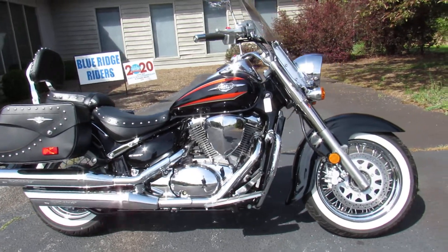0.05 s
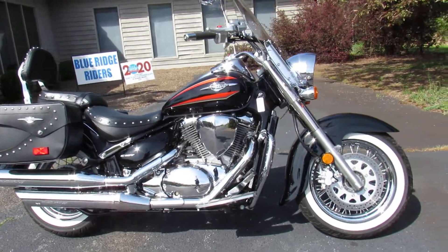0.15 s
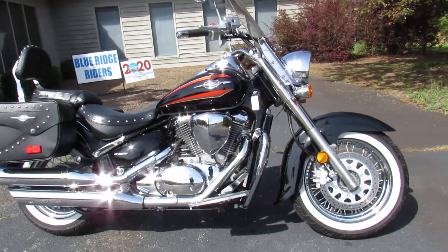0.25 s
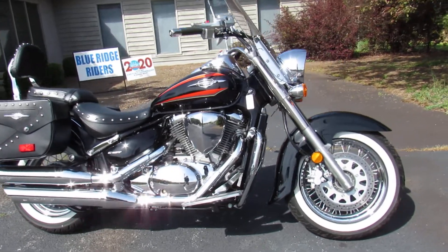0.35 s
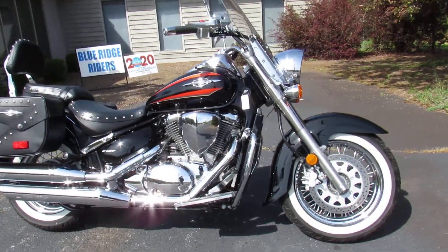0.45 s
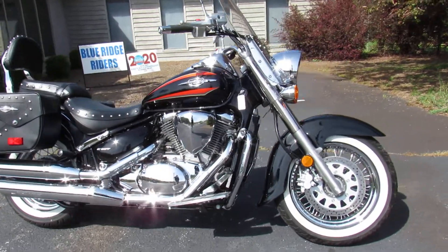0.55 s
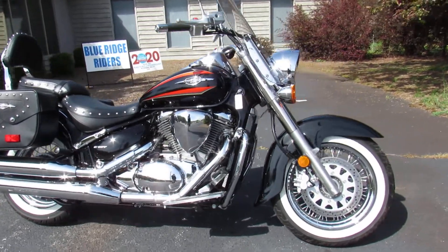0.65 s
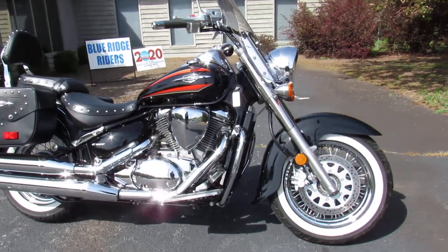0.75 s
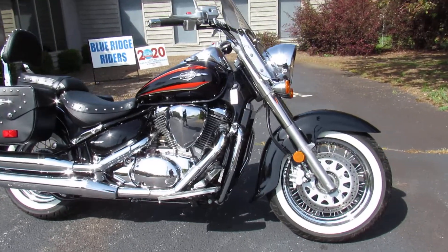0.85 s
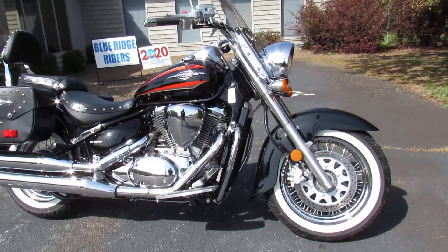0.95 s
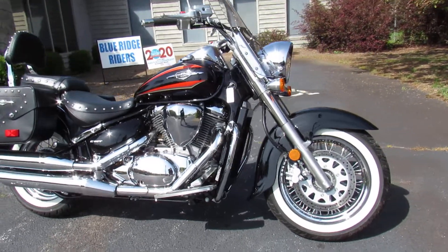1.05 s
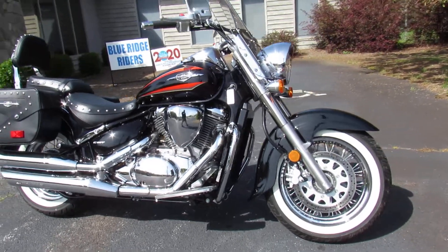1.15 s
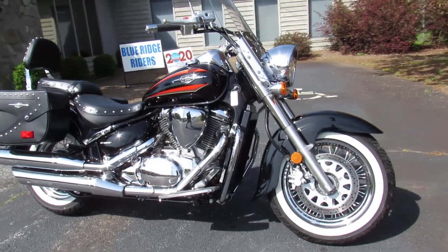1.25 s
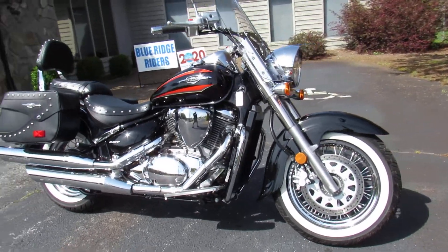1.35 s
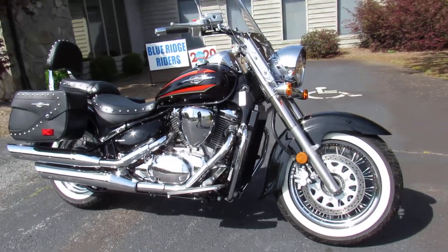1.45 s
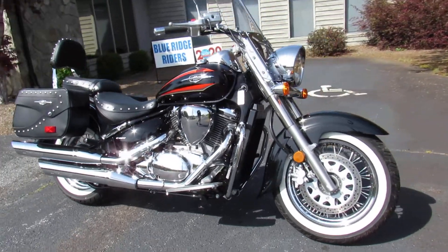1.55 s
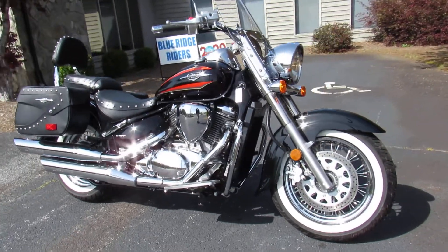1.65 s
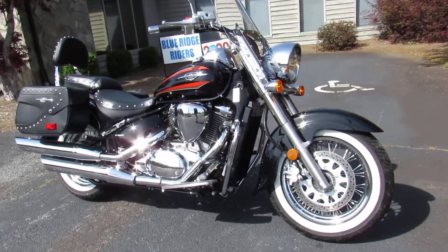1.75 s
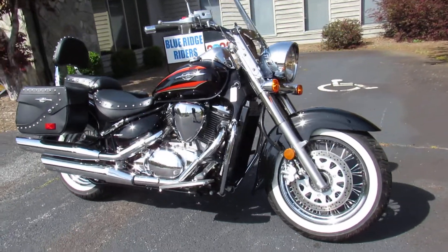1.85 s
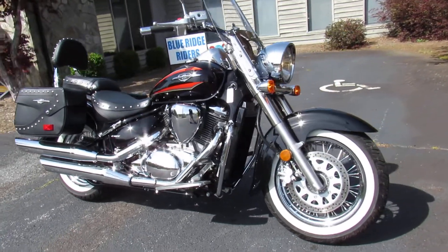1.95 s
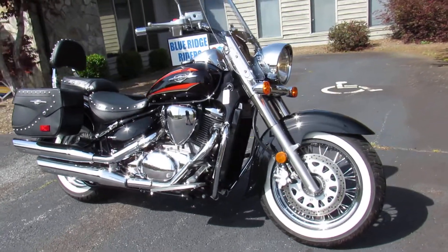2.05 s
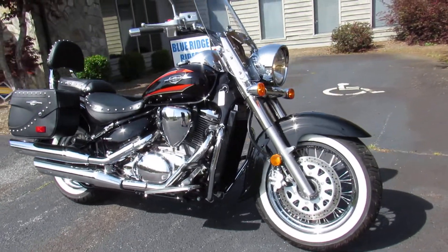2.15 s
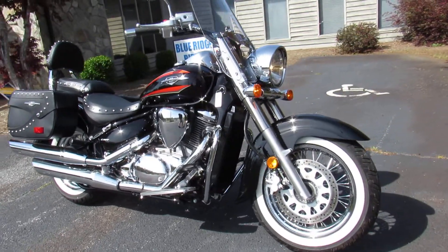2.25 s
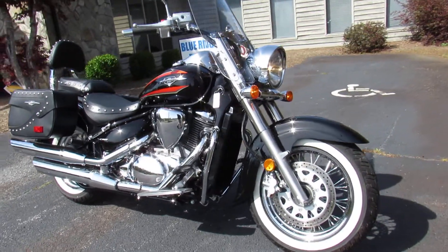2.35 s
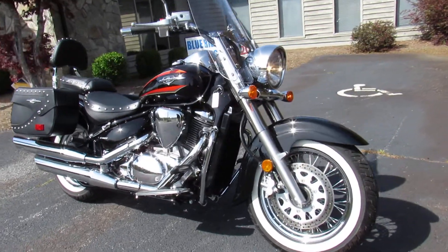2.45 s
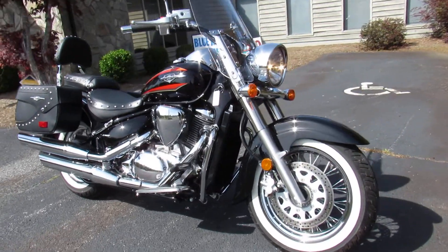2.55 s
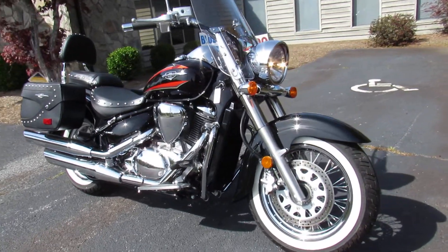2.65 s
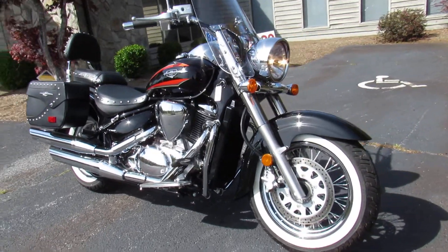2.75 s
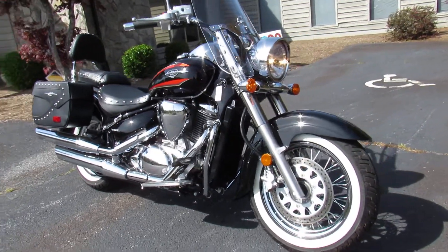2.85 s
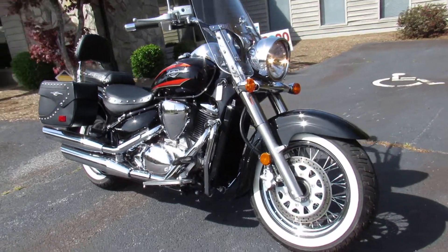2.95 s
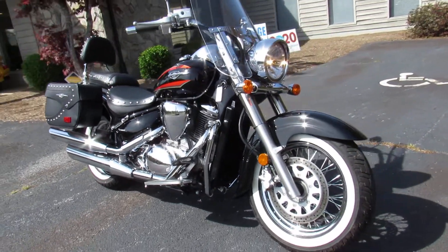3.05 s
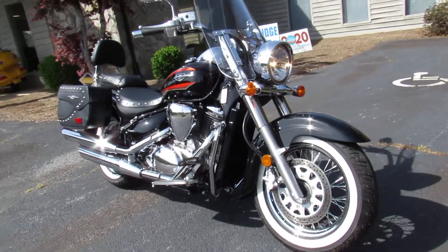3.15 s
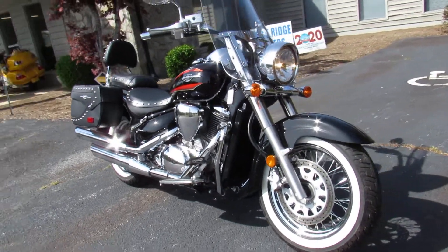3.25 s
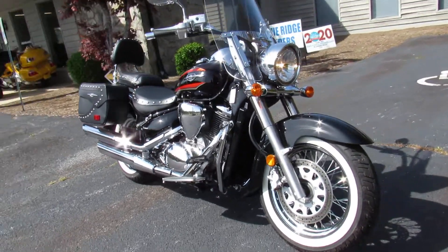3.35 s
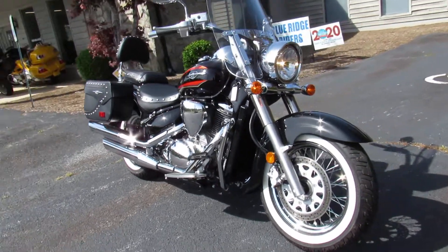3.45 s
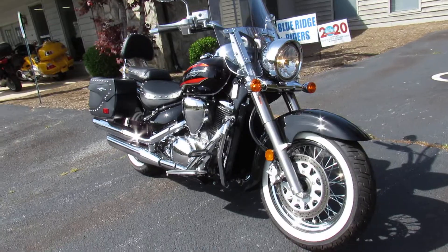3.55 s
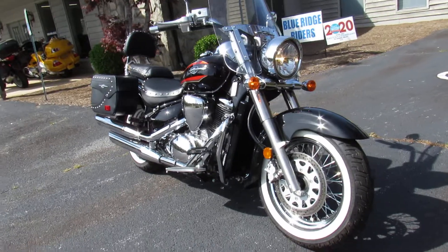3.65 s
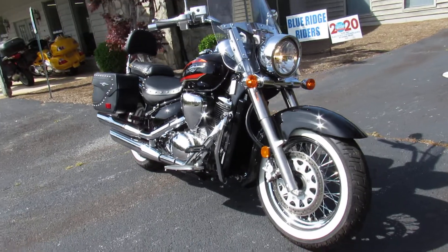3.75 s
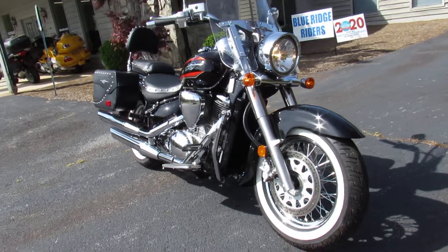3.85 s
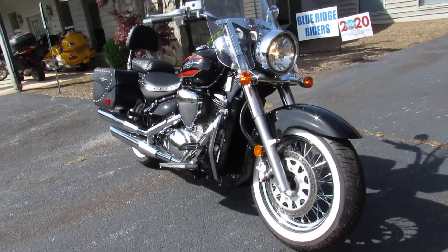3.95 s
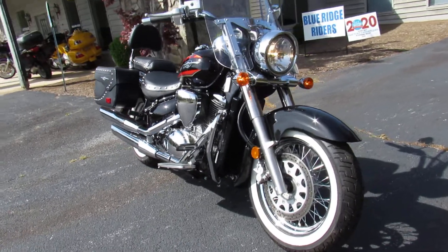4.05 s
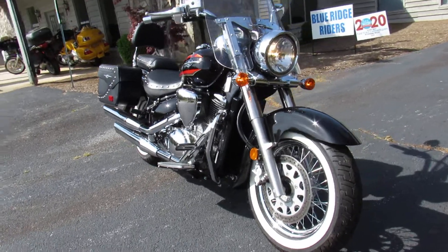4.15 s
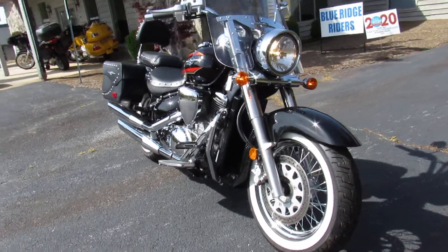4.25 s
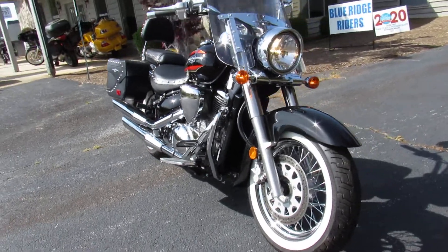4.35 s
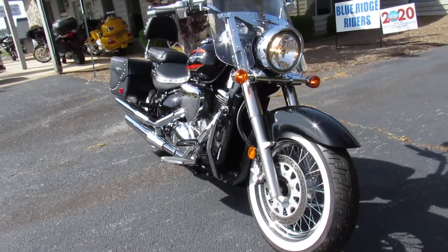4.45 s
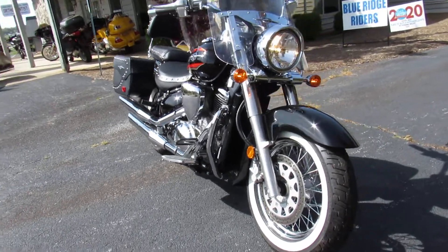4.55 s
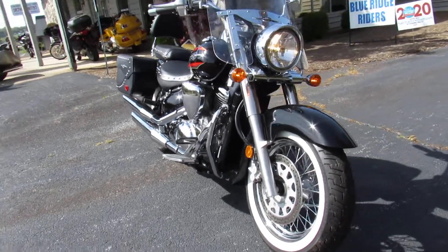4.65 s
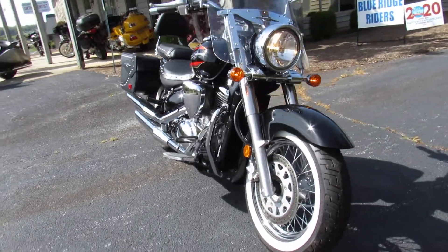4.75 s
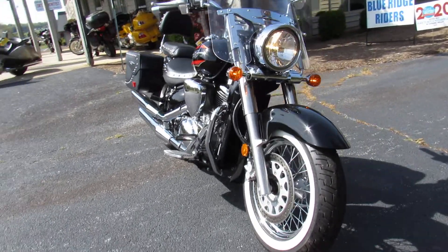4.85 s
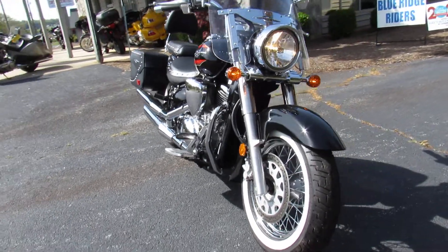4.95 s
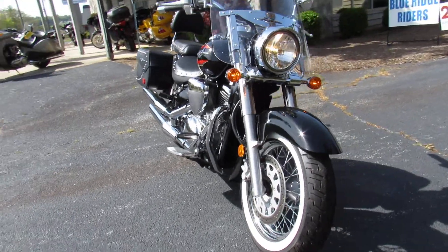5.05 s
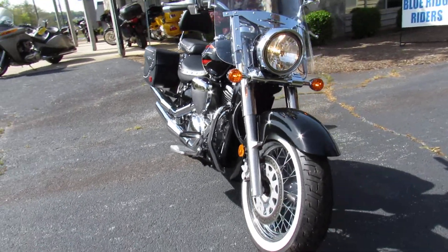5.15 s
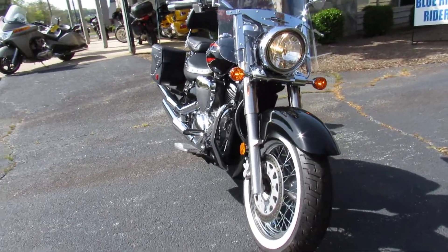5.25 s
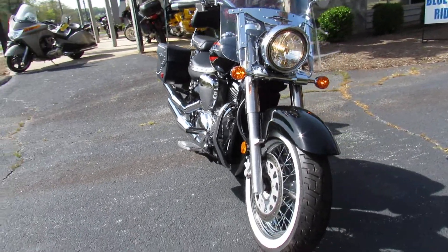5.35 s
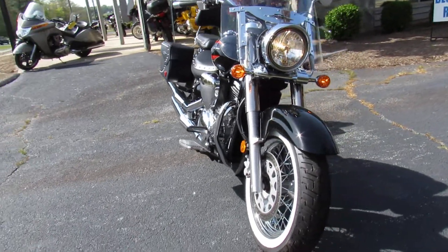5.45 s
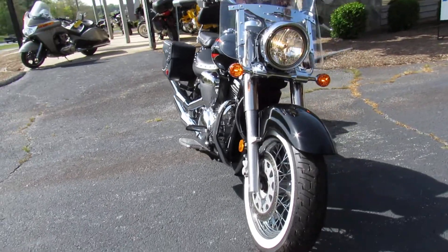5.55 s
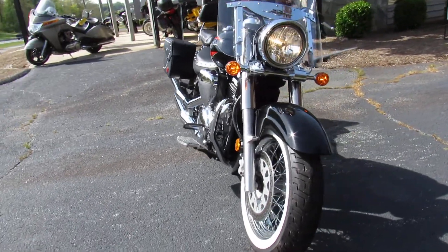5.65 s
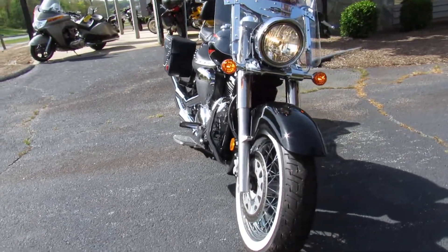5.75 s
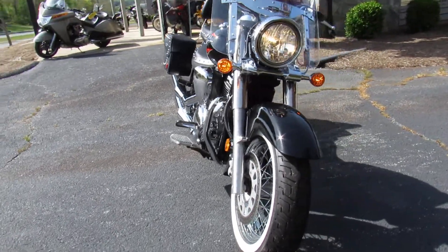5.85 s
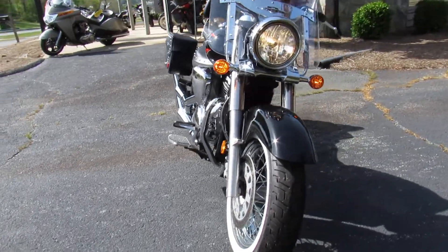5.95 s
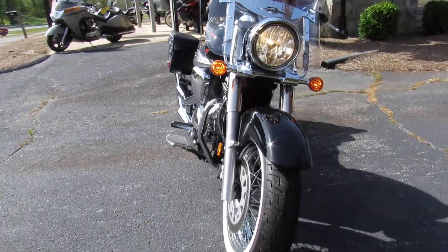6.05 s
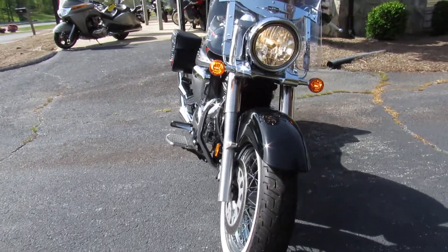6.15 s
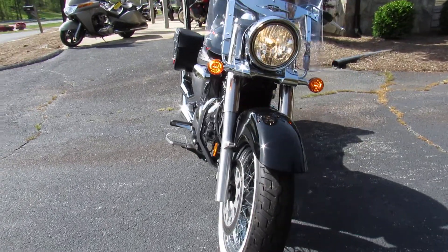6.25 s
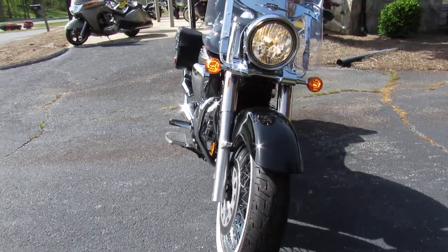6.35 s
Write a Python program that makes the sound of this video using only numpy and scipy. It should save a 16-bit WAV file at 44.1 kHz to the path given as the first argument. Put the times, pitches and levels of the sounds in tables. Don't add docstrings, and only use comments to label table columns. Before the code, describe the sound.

Outdoors on a paved yard, a twin-cylinder motorcycle idles throughout with paired, uneven low thumps, breathy exhaust chuff and busy metallic ticking. It starts distant and quiet beneath short low wind buffets hitting a small hand-held camera's close stereo microphones. The wind dies after about two and a half seconds while the engine grows steadily louder, then stays level up close.

```python
import sys
import numpy as np
from scipy import signal
from scipy.fft import rfft, irfft, next_fast_len
from scipy.io import wavfile
from scipy.ndimage import uniform_filter1d

SR = 44100
rng = np.random.default_rng(int(sys.argv[2]) if len(sys.argv) > 2 else 0)


def elevation(decibels):
    levels = np.asarray(decibels, float)
    return 10 ** (levels / 20)


def persist_wave(psi):
    counts = np.round(np.clip(psi, -1, 1) * 32767).astype(np.int16)
    wavfile.write(sys.argv[1], SR, np.atleast_2d(counts).T)


N = 282240
PAD = 4410
SIZE = N + 2 * PAD
TIME = (np.arange(SIZE) - PAD) / SR
HZ = np.fft.rfftfreq(SIZE, 1 / SR)

# time_s, speed_cycles_per_s
IDLE_SPEED = [(0, 9.359), (.77, 9.475), (1.26, 9.471), (1.87, 10.094), (1.934, 9.385), (2.4, 9.589),
              (3.04, 10.001), (3.28, 9.601), (3.6, 10.137), (3.99, 9.639), (4.47, 10.316), (4.78, 9.728),
              (5.44, 9.936), (5.51, 10.012), (6.28, 9.88), (6.33, 9.35), (6.4, 9.35)]
FIRST_CYCLE, NOMINAL_SPEED = -.882, 9.93
# place_cycle (0-1), puff_hz
FIRINGS = [
    (0.123, 356.9),
    (0.414, 50.0),
]
# pitch_hz, width_hz, strength (signed ratio)
FRONT_PIPE = [(56.1, 44.2, -0.66), (92.3, 5.0, 0.2), (125.9, 5.0, -0.07), (134.8, 5.6, 0.09)]
REAR_PIPE = [(42.6, 5.3, -0.15), (84.0, 19.2, 1.48), (116.3, 12.2, -0.18), (156.1, 5.0, -0.6)]
# time_s, level_db
ENGINE_LEVEL = [
    (0, -32),
    (.6, -29.5),
    (1.4, -28.5),
    (2, -26.5),
    (2.6, -24),
    (4, -19),
    (4.7, -16.5),
    (5.4, -15),
    (6.4, -15),
]
# pitch_hz, level_db (per Hz)
CHUFF_COLOUR = [(20, -28), (45, -21), (70, 0.5), (120, -2.5), (160, -1.5), (200, -0.5), (270, -3.5),
                (330, -8), (450, -12.5), (600, -13.5), (800, -19.5), (1200, -59.5)]
# pitch_hz, level_db (per Hz)
CLATTER_COLOUR = [(440, -46), (750, -8), (997, -0.5), (1540, -3.5), (2350, -12.5), (2590, -13.5),
                  (4200, -23.5), (4810, -21), (5180, -23.5), (7240, -26), (9450, -36.5), (11000, -45),
                  (12400, -39), (14500, -48)]
# pitch_hz, width_hz, level_db
FINS = [(970, 90, -6), (1970, 40, -3), (2525, 40, -5), (2640, 38, -1), (2885, 60, -4), (3180, 50, -5),
        (3420, 160, -5), (3976, 40, -4), (4500, 48, -3), (4903, 35, -3), (5335, 25, -2), (5905, 25, -2),
        (6550, 35, -4)]
# place_cycle (0-1), spread_cycle (0-1), level_db, centre_hz
VALVES = [
    (.21, .018, 1, 8000),
    (.26, .03, 3, 2100),
    (.32, .04, -1, 800),
    (.43, .035, 0, 5500),
    (.71, .022, 6, 11500),
    (.78, .07, -4, 4500),
    (.88, .03, 1, 2700),
    (.89, .022, 1, 13000),
    (.9, .025, 2, 1000),
]
CLATTER_DB = -15
SHADE_FROM_S, SHADE_DB_PER_S = 5.12, -2
# pitch_hz, left_minus_right_db
BALANCE = [(60, 6), (140, 6), (320, 4.8), (490, 4), (750, 1.5), (1140, .5), (1740, 0), (4100, 0), (4500, 2),
           (5500, 4), (7400, 8), (9300, .8), (11500, -.5), (12800, -4)]
# pitch_hz, lead_radians
LEAD = [(0, 0), (950, -0.5), (2670, -0.0), (4220, -0.1), (7060, -1.3), (9040, -2.8), (9560, -2.9),
        (11100, -3.1), (12700, -2.9), (14500, -3.2)]
# pitch_hz, likeness (0-1)
LIKENESS = [(60, .998), (300, .98), (900, .96), (2200, .955), (2700, .985), (3500, .99), (4000, .994),
            (4400, .94), (5500, .86), (8000, .78), (11000, .9), (12500, .58), (14000, .35)]
# pitch_hz, level_db (per Hz)
LIGHT_COLOUR = [(15, -24), (40, -35), (90, 20), (180, 13), (350, 0.5), (600, -28), (1200, -51)]
# pitch_hz, level_db (per Hz)
GUST_COLOUR = [(15, -28), (50, -2), (135, -5), (300, 0), (440, -3.5), (680, -17), (950, -21), (1300, -38),
               (2000, -65)]
# start_s, hold_s, level_db
PUFFS = [(.08, 0.051, -20.5), (0.245, 0.067, -14), (.35, .17, -22), (.55, 0.12, -27.5),
         (0.743, 0.014, -17.5), (0.811, 0.042, -15.5), (.94, 0.071, -27), (1.127, 0.089, -19),
         (1.223, 0.083, -13), (1.36, 0.073, -21.5), (1.531, 0.081, -17), (1.662, .02, -20),
         (1.85, 0.27, -42), (2.24, .11, -26), (2.358, 0.13, -21.5), (2.57, 0.093, -41)]
PUFF_RISE_DB_PER_S, PUFF_FALL_DB_PER_S, CALM_DB = 420, 330, -68


def evened(x):
    return x / np.sqrt(np.mean(x ** 2) + 1e-20)


def read(points, hz):
    f, value = np.transpose(points)
    return np.interp(np.log(hz + 1), np.log(f + 1), value)


def curve(rows):
    time_s, value = np.transpose(rows)
    return np.interp(TIME, time_s, value)


def coloured(x, gain):
    return irfft(rfft(x) * gain, SIZE)


def lumps(hz, channels=1):
    knots = np.arange(-1, N / SR + 1, .5 / hz)
    values = rng.standard_normal((channels, 2500))[:, :len(knots)]
    return evened(np.array([np.interp(TIME, knots, v) for v in values]))


def nearness_to(cycles, place, spread):
    distance = (cycles - place + .5) % 1 - .5
    return np.exp(-.5 * (distance / spread) ** 2)


def exhaust(cycles):
    uneven_db, early_cycles = .8, .003
    size = next_fast_len(N + SR)
    s = 1j * np.fft.rfftfreq(size, 1 / SR)
    count = np.arange(70)
    out = 0
    for (place, puff_hz), pipe in zip(FIRINGS, (FRONT_PIPE, REAR_PIPE)):
        strength, shift = rng.standard_normal((len(count), 2)).T
        fired_s = (count + place + early_cycles * shift) / NOMINAL_SPEED
        firings = np.zeros(size)
        firings[(fired_s * SR).astype(int)] = elevation(uneven_db * strength)
        rings = sum(g * s * hz / (s * s + s * width + hz * hz) for hz, width, g in pipe)
        puffs = rfft(firings) / (1 + s / puff_hz) ** 2
        out = out + irfft(puffs * rings, size)
    played = (cycles + 3) / NOMINAL_SPEED * SR
    return evened(np.interp(played, np.arange(size), out))


def chuff(cycles):
    swell = 1 + .45 * nearness_to(cycles, .35, .08) + .2 * nearness_to(cycles, .08, .07)
    noise = rng.standard_normal((2, SIZE)) * swell * elevation(.8 * lumps(25))
    return evened(coloured(noise, elevation(read(CHUFF_COLOUR, HZ))))


def clatter(cycles):
    taps = rng.standard_normal((2, SIZE))
    drive = rfft(taps * elevation(0.76 * lumps(60) + .5 * lumps(12)))
    for k, (place, spread, blow_db, hz) in enumerate(VALVES):
        grit = np.roll(taps, 9000 * (k + 1), axis=1)
        rattle = grit * nearness_to(cycles, place, spread) * elevation(blow_db + 2.0 * lumps(10))
        octaves = np.log2((HZ + 1) / hz)
        drive = drive + rfft(rattle) * np.exp(-.5 * (octaves / .7) ** 2)
    fins = 1 + sum(elevation(db) / (1 + 2j * (HZ - hz) / width) for hz, width, db in FINS)
    return evened(irfft(drive * elevation(read(CLATTER_COLOUR, HZ)) * fins, SIZE))


def ports(common, apart):
    left = elevation(read(BALANCE, HZ))
    same = np.clip(read(LIKENESS, HZ), 0, 1)
    lag = np.exp(-1j * np.interp(HZ, *np.transpose(LEAD)))
    both = np.sqrt(left ** 2 + 1 + 2 * left * same * lag.real) / 2
    right = coloured(common, same * lag / both) + coloured(apart, np.sqrt(1 - same ** 2) / both)
    return np.array([coloured(common, left / both), right])


def breeze_db():
    start, hold, db = np.transpose(PUFFS)[:, :, None]
    before = np.maximum(start - TIME, 0)
    after = np.maximum(TIME - start - hold, 0)
    puffs_db = db - PUFF_RISE_DB_PER_S * before - PUFF_FALL_DB_PER_S * after
    return np.maximum(puffs_db.max(axis=0), CALM_DB)


def breeze():
    level_db = breeze_db()
    gusty = np.clip((level_db + 22.0) / 16, 0, 1)
    eddies = rng.standard_normal((2, SIZE)) * elevation(4.5 * lumps(90, channels=2))
    light = evened(coloured(eddies, elevation(read(LIGHT_COLOUR, HZ))))
    gust = evened(coloured(eddies, elevation(read(GUST_COLOUR, HZ))))
    push = (1 - gusty) * light + gusty * gust
    steady = push / np.sqrt(uniform_filter1d(push ** 2, 2600, axis=1) + .1)
    a, b = steady * elevation(level_db) * elevation([[-6], [-.6]])
    return np.array([a - 0.6 * b, b - 0.5 * a])


def scene():
    turned = np.cumsum(curve(IDLE_SPEED)) / SR
    cycles = FIRST_CYCLE + turned - turned[PAD]
    low = elevation(curve(ENGINE_LEVEL))
    high = low * elevation(CLATTER_DB + SHADE_DB_PER_S * np.maximum(TIME - SHADE_FROM_S, 0))
    firing = low * elevation(-1.0) * exhaust(cycles)
    noise = low * elevation(-9.5) * chuff(cycles) + high * clatter(cycles)
    both = ports(firing + noise[0], noise[1]) + breeze()
    return both[:, PAD:-PAD]


def top_cut(x):
    return signal.sosfilt(signal.butter(12, 14870, fs=SR, output="sos"), x)


def record(dry):
    notch = 1 - 0.76 / (1 + 2j * (HZ - 700) / 140)
    bass_cut = 1 / np.sqrt(1 + (30 / (HZ + 1)) ** 6)
    padded = np.pad(dry, ((0, 0), (PAD, PAD)), "reflect")
    heard = coloured(padded, notch * bass_cut)[:, PAD:-PAD]
    heard = heard * np.minimum(np.arange(N, 0, -1) / 150, 1)
    return top_cut(heard)


dry = scene()
out = record(dry)
persist_wave(out)
```